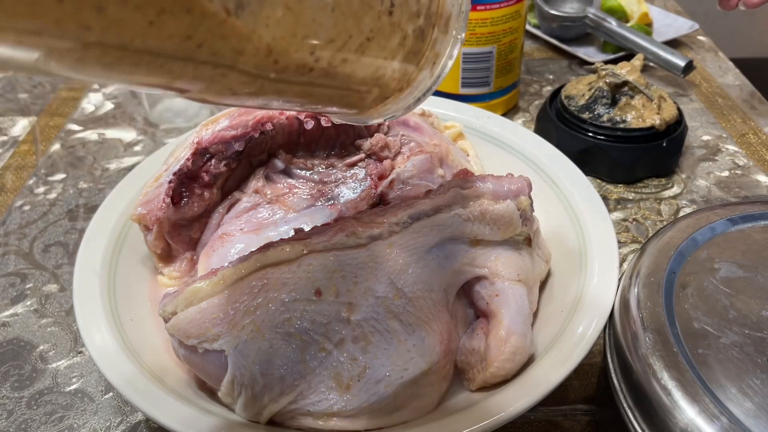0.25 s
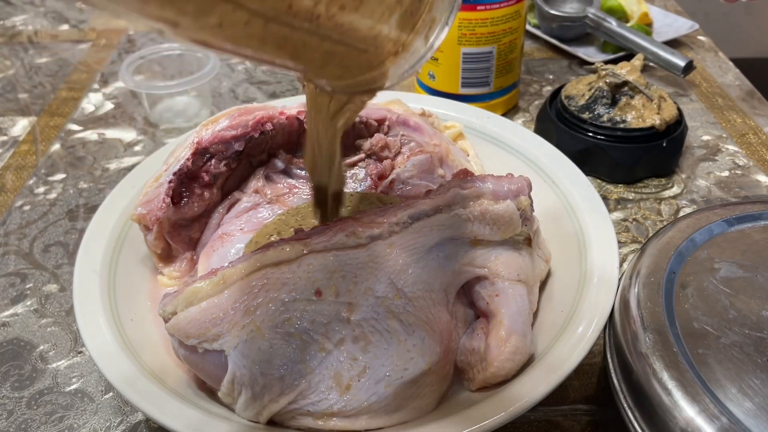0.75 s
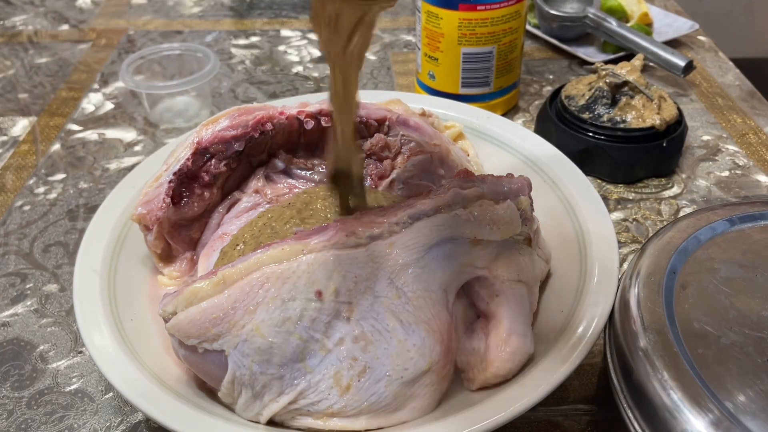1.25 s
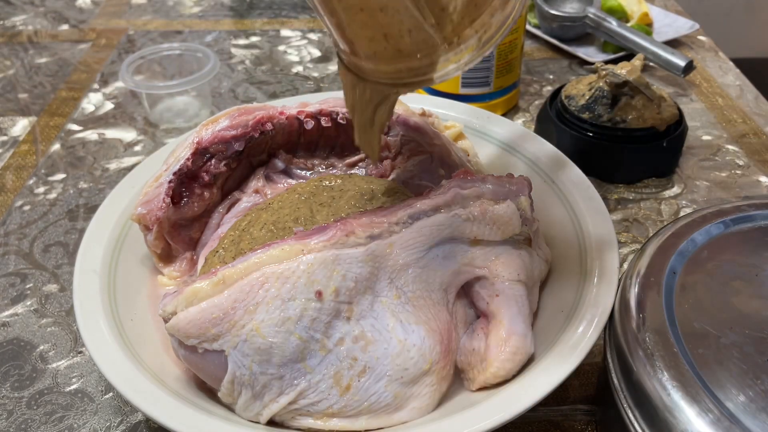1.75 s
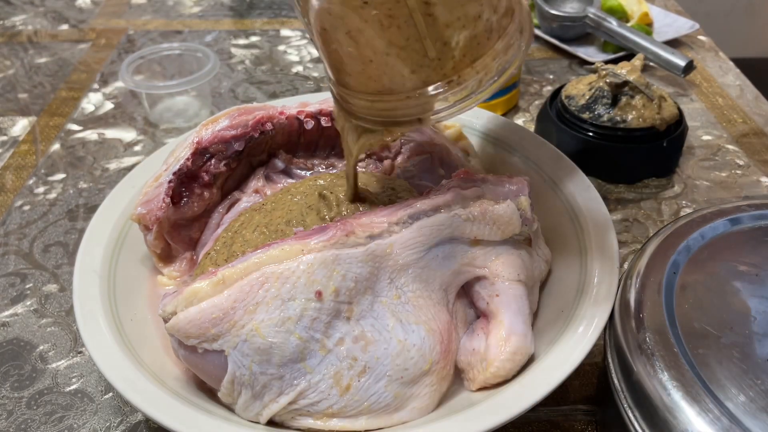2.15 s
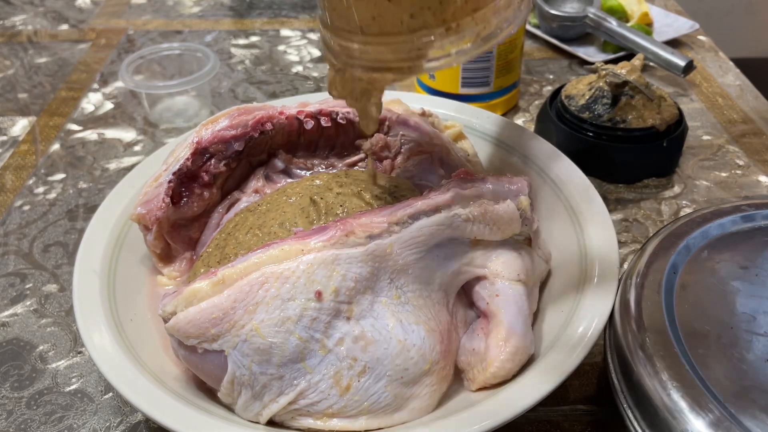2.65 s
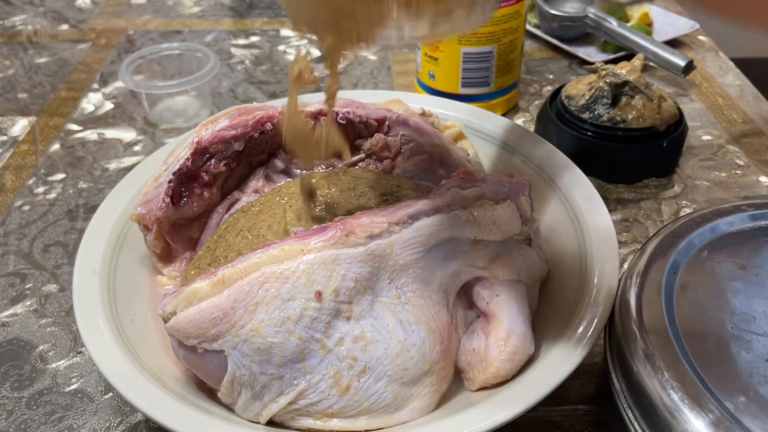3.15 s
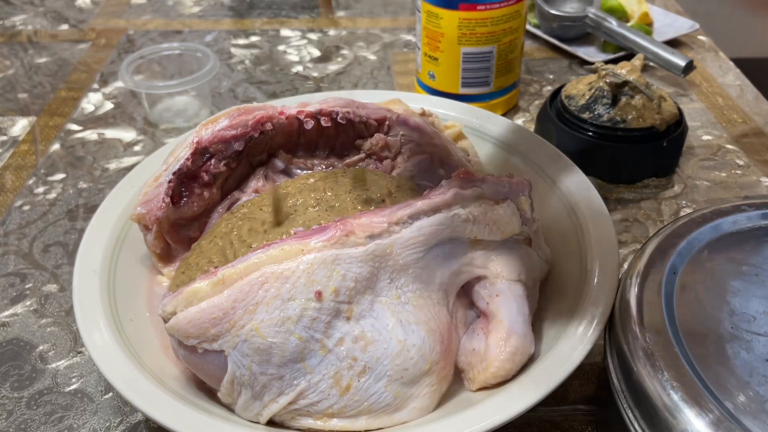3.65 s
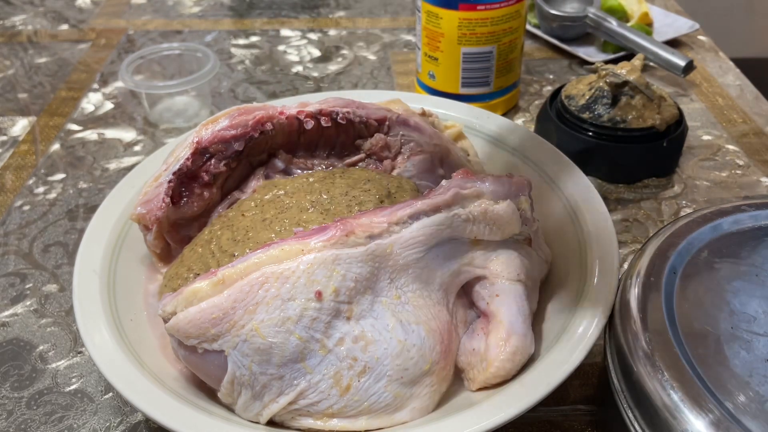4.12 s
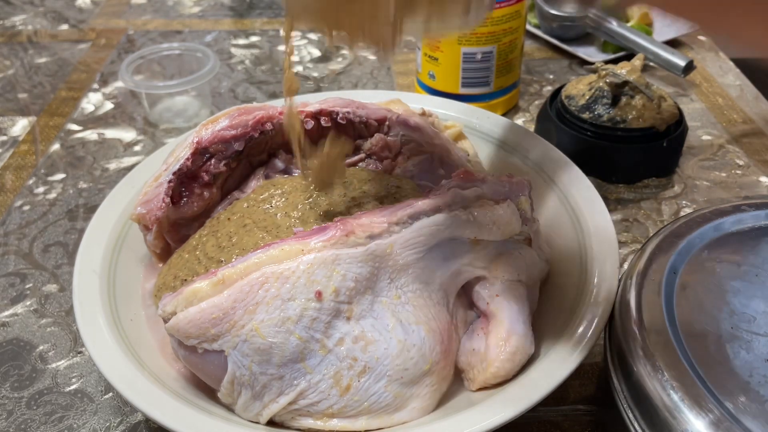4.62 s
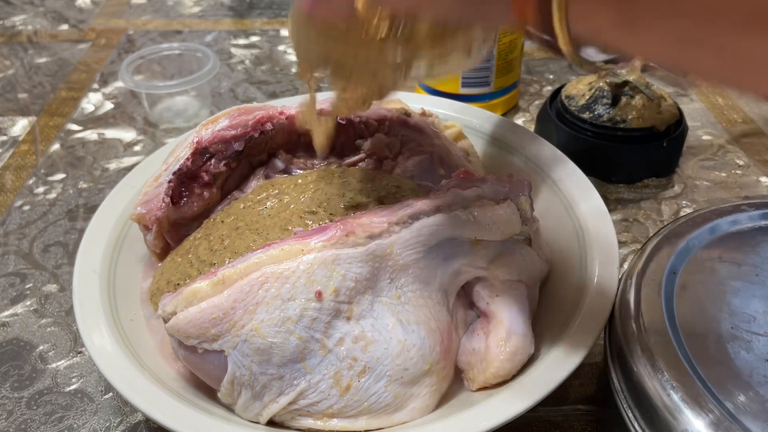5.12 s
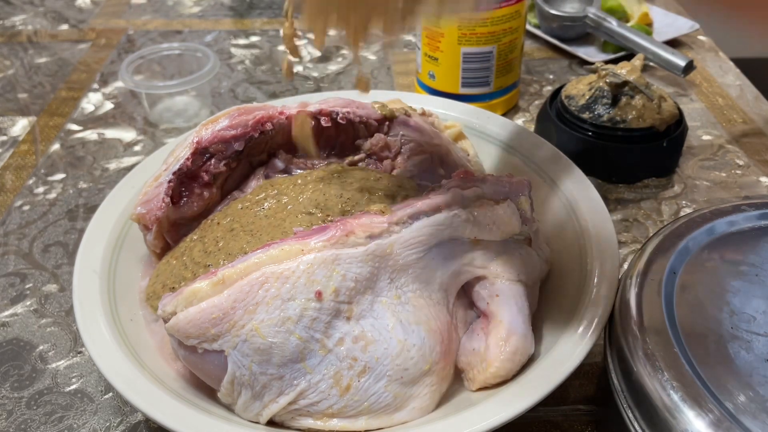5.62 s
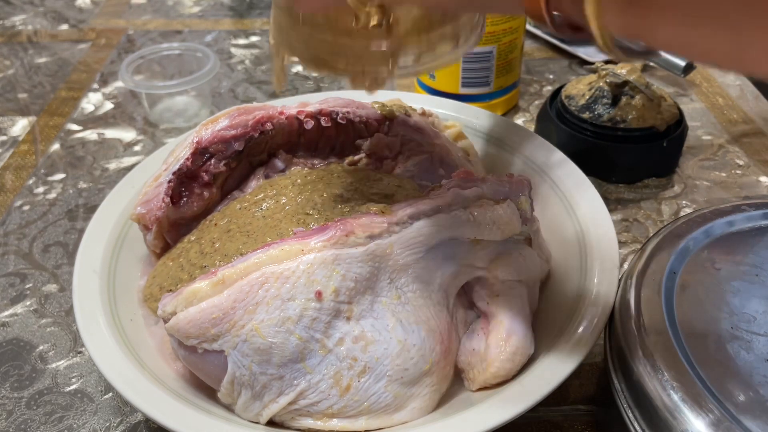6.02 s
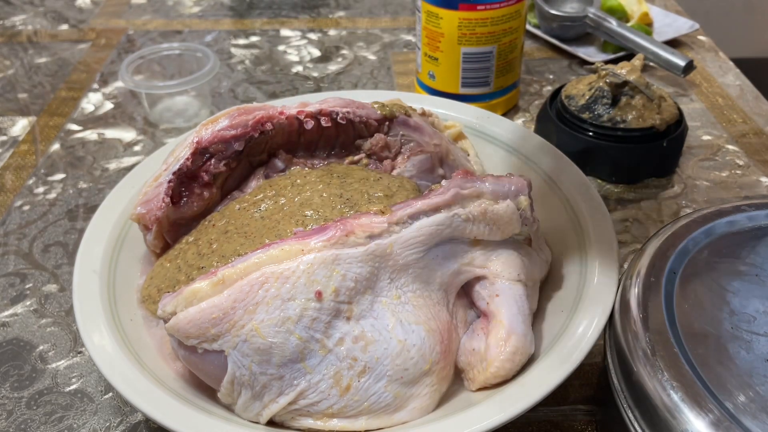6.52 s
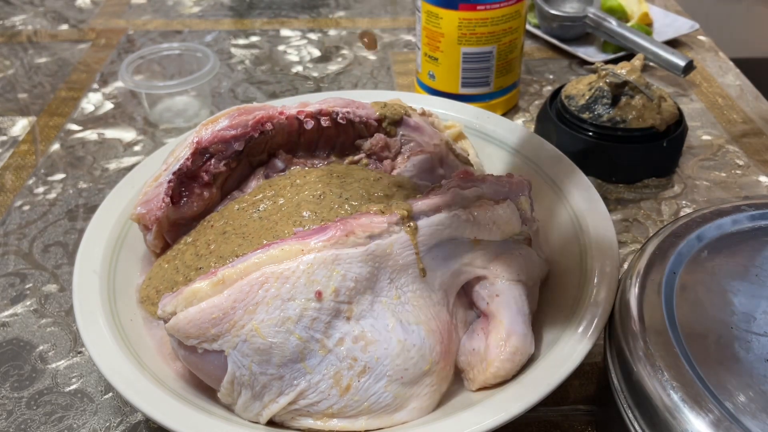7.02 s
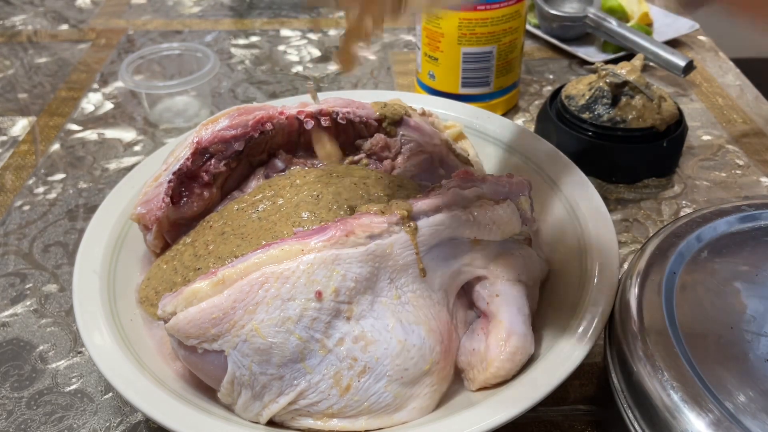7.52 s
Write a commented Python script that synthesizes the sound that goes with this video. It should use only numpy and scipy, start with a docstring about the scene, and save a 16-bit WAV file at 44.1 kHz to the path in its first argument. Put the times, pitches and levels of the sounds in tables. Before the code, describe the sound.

Thick paste crackles and pops softly from a glass jar while metal bangles clink sharply, with a vehicle passing outside.

```python
"""First you hear a quiet kitchen: a hum, a thin high whine and the engine of a vehicle passing outside.
Thick paste is shaken from a blender jar onto a chicken. It crackles as it peels off the glass, and its
air pockets pop and plop. Thin metal rings, likely bangles on the shaking wrist, clink, bounce and slide.
One distant boom rolls by early on. Near the end a smaller metal piece ticks and the jar takes a knock."""
import sys
import numpy as np
from scipy import signal
from scipy.fft import rfft, irfft
from scipy.io import wavfile

SR = 44100
rng = np.random.default_rng(int(sys.argv[2]) if len(sys.argv) > 2 else 0)


def output_pcm(signal):
    """Save a mono or channel-first signal as 16-bit PCM at the path in sys.argv[1].

    Samples are clipped to [-1, 1] before scaling.
    """
    pcm = np.clip(np.atleast_2d(signal).T, -1, 1) * 32767
    wavfile.write(sys.argv[1], SR, np.round(pcm).astype(np.int16))


N = 342657
TIME, HZ = np.arange(N) / SR, np.fft.rfftfreq(N, 1 / SR)


def amp(db):
    """Turns decibels into a number to multiply a sound by."""
    return 10 ** (np.asarray(db) / 20)

def unit(x):
    """Scales a sound to an average (rms) level of one."""
    return x / np.sqrt(np.mean(x ** 2) + 1e-30)

def read(points, hz):
    """Looks up a table's value at any frequency, blending between its rows."""
    f, value = np.transpose(points)
    return np.interp(np.log(hz + 1), np.log(f), value)

def add(mix, s, sound):
    """Mixes a sound in, starting at s seconds."""
    part = mix[round(s * SR):][:len(sound)]
    part += sound[:len(part)]

def drift(hz):
    """A random wobble, up to about hz times a second."""
    return unit(irfft(rfft(rng.standard_normal(N)) / (1 + (HZ / hz) ** 4), N))

def tone(hz, db):
    """A pure tone that follows a changing pitch."""
    return np.sqrt(2) * amp(db) * np.sin(2 * np.pi * np.cumsum(hz) / SR)

def swells(rows, half_s):
    """A level that rises and falls smoothly around each listed time."""
    return sum(amp(db) * np.exp(-((TIME - s) / half_s) ** 2) for s, db in rows)

def fade(t, t60):
    """Dies away by 60 dB in t60 seconds, the 'fade time'."""
    return amp(-60 * t / t60)

def dying(x, t60s, size=256):
    """Lets every frequency die away at its own speed."""
    hz, t, spectra = signal.stft(x, SR, nperseg=size)
    faded = spectra * fade(t, read(t60s, hz)[:, None])
    return signal.istft(faded, SR, nperseg=size)[1][:, :x.shape[1]]

def specks(per_s, spread_db):
    """Tiny clicks at random times, most weak and a few strong."""
    signs = rng.choice([-1, 1], N)
    sizes = amp(spread_db * np.minimum(rng.exponential(1, N), 4))
    return signs * sizes * (rng.random(N) < per_s / SR)

# How alike the room sounds on the left and right: (frequency [Hz], likeness [0 to 1])
LIKENESS = [(30, 0.97), (100, 0.99), (160, 0.94), (250, 0.64), (500, 0.27), (1000, 0.11), (2000, 0.15),
            (5000, 0.38), (9000, 0.689)]
def pair(noises):
    """Blends two noises into left and right spectra that are most alike in the bass."""
    a, b = rfft(noises)
    same = read(LIKENESS, np.fft.rfftfreq(noises.shape[1], 1 / SR))
    mid, side = a * np.sqrt((1 + same) / 2), b * np.sqrt((1 - same) / 2)
    return np.array([mid + side, mid - side])

def diffuse(spectrum):
    """Noise from all around, with the tone colour given by a table."""
    colour = amp(read(spectrum, HZ)) / np.sqrt(1 + (20 / (HZ + 1)) ** 4)
    return unit(irfft(pair(rng.standard_normal((2, N))) * colour, N))

# Borders of the five bands, low to high, that make up a hit: (frequency [Hz])
BAND_EDGES = [1200, 4700, 6800, 8200, 10300, 14000]
# Tone colour of the crack when things touch: (frequency [Hz], level [dB])
CRACK_COLOUR = [(1200, -11), (2300, -25.5), (3200, -9.5), (4300, -10.5), (5600, -1), (6500, -4.5),
                (7300, -16), (8600, 7.5), (9600, 5), (11100, 13.5), (12300, -14), (13100, -15.5),
                (13900, -23), (15000, -38)]
def strikes(rows, notes, crack_db=0, free_db=0, vary_db=0, detune=0, snap_db=0, size=4096):
    """Each hit cracks and rings an object's notes; touch stops them fast, but a free ring lasts."""
    out, t, hz = np.zeros(N), np.arange(size) / SR, np.fft.rfftfreq(size, 1 / SR)
    f, db, t60 = np.reshape(notes, (-1, 3)).T
    head = t < .005  # the first 5 ms set a hit's level
    attack = (1 - np.exp(-(t / .0004) ** 2)) * (1 + amp(snap_db) * np.exp(-t / .0012))
    free = amp(free_db) * fade(t, t60[:, None])
    for s, *levels_db, contact_t60 in rows:
        damped = fade(t, contact_t60)
        weight, shift, phase = rng.standard_normal((3, len(f), 1))  # each hit lands on another spot
        turns = f[:, None] * (1 + detune * shift) * t + phase
        rings = amp(db[:, None] + vary_db * weight) * np.sin(2 * np.pi * turns) * (damped + free) * attack
        noise = rfft(rng.standard_normal(size)) * amp(read(CRACK_COLOUR, hz))
        for lo, hi, level_db in zip(BAND_EDGES, BAND_EDGES[1:], levels_db):
            crack = irfft(noise * ((hz >= lo) & (hz < hi))) * damped * attack
            ring = rings[(f >= lo) & (f < hi)].sum(0)
            band = ring / (ring[head].std() + 1e-12) + amp(crack_db) * crack / crack[head].std()
            add(out, s, amp(level_db) * band / band[head].std())
    return out

def tilted(rows, colour_db, t60, pivot_hz=7000):
    """Gives light hits a level in each band: one shared colour, tilted brighter or duller."""
    s, db, tilt = np.transpose(rows)
    centres_hz = np.sqrt(np.multiply(BAND_EDGES[:-1], BAND_EDGES[1:]))
    levels_db = db[:, None] + colour_db + tilt[:, None] * np.log2(centres_hz / pivot_hz)
    return np.column_stack([s, levels_db, np.full(len(s), t60)])

# The still kitchen's low rush and high hiss: (frequency [Hz], level [dB])
AIR_COLOUR = [(20, -12), (45, -2.5), (85, -2), (130, -7), (177, -9.5), (240, -15.5), (330, -15), (480, -20),
              (700, -19.5), (1150, -32), (2000, -30.5), (3160, -52), (6000, -48), (16000, -71)]
HISS_COLOUR = [(3000, -13.5), (6000, -1), (9300, 5), (11300, 9), (12200, 0), (13000, -13.5), (16000, -22)]
# An appliance's humming notes: (pitch [Hz], level [dB])
HUM_NOTES = [(177.6, -71), (236.9, -74), (721.4, -80), (958.2, -82), (1986, -93.5)]
def room_tone():
    """Steady air noise and the slightly wavering hum of an appliance."""
    air = amp(-61) * diffuse(AIR_COLOUR) + amp(-87.5) * diffuse(HISS_COLOUR)
    return air + sum(tone(hz + 1.806 * drift(6.2), db + 2 * drift(4)) for hz, db in HUM_NOTES)

# Moments when the whine gets louder: (time [s], level [dB])
WHINE_SWELLS = [(.01, -76.5), (.16, -75), (.27, -70.5), (.8, -74), (.97, -86), (6.21, -67), (7.3, -88)]
def whine(hz=4940, resting_db=-85):
    """A thin high note that flutters and briefly swells."""
    note = tone(hz + 12 * drift(7.1) + 36 * drift(120), 4 * drift(22.02))
    return note * (amp(resting_db) + swells(WHINE_SWELLS, half_s=.032))

# Tone colours of engine rumble, exhaust drone and tyre roar: (frequency [Hz], level [dB])
ENGINE_COLOUR = [(25, -24), (55, -4.5), (80, 5), (110, -7.5), (160, -31.5), (400, -55.5)]
DRONE_COLOUR = [(60, -36.5), (115, 2.5), (190, -0.5), (255, -1.5), (310, -12), (450, -31), (1200, -60)]
TYRE_COLOUR = [(150, -14), (350, -3), (600, 2.5), (1000, 2.5), (1400, -3), (2200, -11.5), (4000, -19),
               (6500, -23), (9000, -32.5), (14000, -53.5)]
# The exhaust as the driver speeds up and eases off: (time [s], level at the nearest distance [dB])
DRONE_LEVELS = [(0, -70), (1.3, -61.5), (2.8, -62), (4.5, -52.5), (5.6, -47), (7.77, -56)]
# The engine's firing note, sinking as it goes by: (time [s], pitch [Hz], level [dB])
ENGINE_NOTE = [(0, 75.8, -62), (.5, 84.7, -61), (1.1, 75.5, -66), (1.8, 80, -53), (2.701, 87, -59.5),
               (3.3, 77, -60), (3.7, 72, -62), (4.7, 71, -61), (5.4, 61, -64.5), (7.77, 58, -79.5)]
def vehicle(pass_s=3.31, metres_per_s=11.5, nearest_m=8.78, pipe_hz=246.4):
    """The engine comes first, the tyres swell and fade with distance, and the exhaust drones away."""
    along = metres_per_s * (TIME - pass_s)
    distance = np.hypot(along, nearest_m)
    facing = (1 - np.tanh((TIME - 3.35) / .2)) / 2  # falls to 0 as the tailpipe turns into view
    rumble_db = -58.5 - 14.5 * facing
    drone_db = np.interp(TIME, *np.transpose(DRONE_LEVELS))
    tyres_db = -57.5 + 3 * along / distance  # louder from behind
    layers = (rumble_db, ENGINE_COLOUR), (drone_db, DRONE_COLOUR), (tyres_db, TYRE_COLOUR)
    roar = sum(amp(db + .8 * drift(8)) * diffuse(colour) for db, colour in layers)
    pipe = tone(pipe_hz + 6 * drift(15), drone_db - 10.5 + 3 * drift(5.7))  # the exhaust's own note
    s, hz, db = np.transpose(ENGINE_NOTE)
    firing = tone(np.interp(TIME, s, hz) + 2 * drift(12), np.interp(TIME, s, db) + 1.7 * drift(5.5))
    return (roar + pipe) * nearest_m / distance + firing

# Sticky crackle, growing with harder shaking: (time [s], level [dB])
CRACKLE_LEVELS = [(0, -105), (.7, -86.5), (2.5, -87.5), (3.3, -75.5), (4.4, -82), (5, -74), (5.9, -73),
                  (6.3, -102), (7.77, -83)]
# Lumps slipping down the glass: (time [s], level [dB])
LUMP_SLIPS = [(1.62, -80), (2.29, -76), (6.68, -67), (7.2, -82)]
def crackle(clump_db=3, dull_hz=8000):
    """Countless tiny snaps come in clumps as paste peels from the glass."""
    snaps = specks(per_s=420, spread_db=3.2)
    grain = unit(irfft(rfft(snaps) * amp(read(CRACK_COLOUR, HZ)) / (1 + (HZ / dull_hz) ** 4), N))
    level = amp(np.interp(TIME, *np.transpose(CRACKLE_LEVELS))) + swells(LUMP_SLIPS, half_s=.053)
    return grain * level * amp(clump_db * drift(25))

# Wet pops of the paste: (time [s], level [dB], brightness [dB per octave])
WET_POPS = [(.441, -70, 1), (.4493, -64, 4), (.628, -75.5, -6), (.9274, -67.5, -4), (.9425, -66.5, 8),
            (1.0753, -68, -3), (1.0976, -60, 10.5), (1.2583, -67, 10), (1.3185, -66, 3),
            (1.4173, -61.5, 4.5), (1.4903, -57.5, 1), (1.5616, -53, 0.5), (1.6251, -59.5, 3),
            (2.21, -81, 14), (3.6024, -63.5, 8), (1.9544, -67.5, -5), (2.6106, -62, 9.5), (3.0182, -62, 3),
            (3.8645, -60.5, 7), (4.2747, -51, -2), (4.5152, -56.5, 1), (4.734, -67, 7), (5.041, -67, -4.5),
            (5.0943, -62, 3), (5.3299, -66, 10), (5.4275, -56.5, 2.5), (5.5334, -60.5, 6),
            (5.7656, -62.5, 4), (5.8645, -63.5, -3.5), (5.9817, -59.5, 1), (6.5867, -64, 1),
            (7.145, -63, -0.5), (7.5668, -72, 16), (7.6891, -63, 3)]
# Their shared colour, one value a band: (level [dB])
POP_BANDS = [-3.5, 0, -2.5, -1.5, -5.5]
def pops():
    """Air pockets snap open in the paste: a short crack with no ring."""
    return strikes(tilted(WET_POPS, POP_BANDS, t60=.016), notes=[], snap_db=2.5, size=2048)

def bounces(hits, softer_db=-22, loss_db=-5, gap_s=.0077, t60=.042, count=2):
    """After each clink the loose rings bounce against each other, softer every time."""
    gaps = gap_s * rng.uniform(.3, 2, (len(hits), count))
    rows = []
    for k, delay in enumerate(np.cumsum(gaps, axis=1).T):
        levels_db = hits[:, 1:-1] + softer_db + k * loss_db
        rows.append(np.column_stack([hits[:, 0] + delay, levels_db, np.full(len(hits), t60)]))
    return np.vstack(rows)

# Bangle hits: (time [s], level [dB], low boost [dB], high boost [dB], fade time while touching [s])
BANGLE_HITS = [(1.6251, -46, -2, -9, .06), (2.8114, -24.5, 1.5, 1, .009), (2.8305, -28, -0.5, -1, 0.022),
               (2.8412, -43, 5.5, 0.5, 0.067), (3.0412, -58, 14, 4, 0.036), (3.1236, -33, 3, -0.5, .013),
               (3.1488, -47.5, 9, 7, .032), (3.1921, -50, 2.5, 1.5, 0.026), (3.4248, -48, 6.5, 0.5, .028),
               (3.4464, -25.5, 0.5, 9.5, .02), (3.4627, -34.5, 5.5, 0, .018), (3.6502, -31, -2.5, 6.5, .02),
               (3.6562, -42, -2.5, 2, .02), (3.6618, -41, 5, -8, .088), (3.679, -31.5, -4, 8, .013),
               (3.6863, -36.5, 3.5, -8, 0.067), (3.7269, -29, -3, -1.5, 0.025),
               (3.7468, -51.5, 11, 12, .11), (3.7831, -23.5, -1.5, -1, 0.039),
               (3.8057, -41.5, 4.5, -14, .018), (4.2048, -43, 6, 3, .07), (4.2072, -40, 7, 4, .024),
               (4.2287, -27, -1, 0, .021), (4.2395, -32.5, 1, 5, 0.03), (4.309, -39, -3.5, 0, .039),
               (4.5194, -44, -1, -4, 0.019), (4.5462, -31.5, 1, -4, 0.037), (4.5849, -19.5, -1, -1.5, .027),
               (4.6014, -34.5, 4.5, -1, .028), (4.669, -45.5, -1, 5, .061), (4.7967, -40.5, 4, 0, .04),
               (4.84, -30.5, 1, -1, .03), (4.8778, -21.5, 0.5, 2.5, .014), (4.895, -36, 1.5, -4, .025),
               (4.9598, -44, 3.5, 9, 0.038), (5.1454, -17, -5, -2, .027), (5.1563, -35.5, 0.5, -2, .03),
               (5.2774, -35, -1.5, 6, 0.017), (5.2871, -36.5, -2.5, -10, 0.055), (5.3544, -48, 3, -4, .048),
               (5.3857, -27, 3.5, 3.5, 0.017), (5.62, -30, 6, 4, 0.02)]
# Their shared colour, one value a band, with the main ring in the fourth: (level [dB])
CLINK_BANDS = [-23.5, -18.5, -12.5, -0.5, -6]
# The notes a bangle rings with: (pitch [Hz], level [dB], fade time [s])
BANGLE_NOTES = [(1410, -17, .09), (1905, -21, .08), (2655, -14, .08), (3150, -21, .05), (3360, -16, .08),
                (4350, -19, .07), (5090, -8, .08), (5400, -16, .05), (5760, -15, .06), (5930, -14, .06),
                (6600, -22, .08), (7240, -18, .07), (7775, -1, .08), (8560, -10, .04), (8720, -6, .05),
                (8820, 0, .08), (8950, -5, .05), (9120, -12, .05), (9460, -7, .08), (10720, -10, .04),
                (11150, -9, .05), (11430, -10, .06), (11900, -2, .06), (12050, -2, .05), (12800, -3, .07)]
def clinks():
    """Bangles clash as the wrist shakes; where they hit sets how low or bright they sound."""
    s, db, low_db, high_db, t60 = np.transpose(BANGLE_HITS)
    spot_db = np.column_stack([low_db, low_db, low_db, np.zeros(len(s)), high_db])
    hits = np.column_stack([s, db[:, None] + CLINK_BANDS + spot_db, t60])
    contacts = np.vstack([hits, bounces(hits)])
    return strikes(contacts, BANGLE_NOTES, crack_db=-5.5, free_db=-10, vary_db=3.5, detune=.003,
                   snap_db=-1.5)

# Tone colour of the boom's rumble: (frequency [Hz], level [dB])
BOOM_COLOUR = [(18, -30.5), (38, -0.5), (70, 1), (110, -3.5), (190, -6), (350, -15), (800, -23.5),
               (1500, -29.5), (3000, -39.5), (6000, -58), (12000, -88.5)]
# How long it rolls on: (frequency [Hz], fade time [s])
BOOM_FADES = [(40, 6.2), (90, 1.6), (200, 1.4), (1000, 3.4), (4000, 4.8)]
def boom(start_s=1.69, throb_hz=42, rise_s=.024, push_s=.00577):
    """A far thud: one push of air, a rumble rolling away, and the house throbbing at its own low note."""
    t = np.maximum(TIME - start_s, 0)
    rolling = dying(diffuse(BOOM_COLOUR)[:, :2 * SR], BOOM_FADES, size=2048)
    rumble = np.zeros((2, N))
    for channel, sound in zip(rumble, rolling):
        add(channel, start_s, sound)
    throb = -np.sin(2 * np.pi * throb_hz * t) * fade(t, t60=1.95)
    from_peak = t / push_s - 4
    push = (1 - from_peak ** 2) * np.exp(-from_peak ** 2 / 2)
    return (amp(-45) * rumble + amp(-42) * throb + amp(-30) * push) * (1 - np.exp(-t / rise_s))

# Air pockets in falling lumps of paste: (time [s], pitch [Hz], level [dB], fade time [s])
AIR_POCKETS = [(2.088, 1170, -49.5, 0.05), (2.097, 1295, -70, 0.047), (4.274, 677, -45, 0.041),
               (4.275, 1470, -41.5, 0.025), (4.276, 1990, -47.5, 0.031), (5.146, 1450, -52.5, 0.057)]
def plops(glide=.2, rise_s=.0013):
    """Each air pocket rings briefly and rises in pitch."""
    out, t = np.zeros(N), np.arange(SR // 8) / SR
    for s, hz, db, t60 in AIR_POCKETS:
        ring = np.sin(2 * np.pi * hz * t * (1 + glide * t / t60)) * fade(t, t60)
        add(out, s, amp(db) * ring * (1 - np.exp(-t / rise_s)))
    return out

# Bangles sliding along each other between clashes: (time [s], level [dB])
BANGLE_SLIDES = [(3.06, -61), (3.41, -65), (3.695, -40), (4.195, -56), (4.565, -59), (4.808, -57),
                 (4.862, -51.5)]
def rubbing(t60=.023, rise_s=.0004):
    """Tiny slips ring the bangles while they slide pressed together."""
    t = np.arange(2048) / SR
    ring = sum(amp(db) * np.sin(2 * np.pi * hz * t) for hz, db, _ in BANGLE_NOTES)
    ring *= fade(t, t60) * (1 - np.exp(-(t / rise_s) ** 2))
    slips = specks(per_s=700, spread_db=4)
    return unit(signal.oaconvolve(slips, ring)[:N]) * swells(BANGLE_SLIDES, half_s=.013)

# Light hits on a smaller metal piece: (time [s], level [dB], brightness [dB per octave])
TICK_HITS = [(5.5107, -58.5, 5.5), (5.727, -66, 10), (5.7428, -57.5, -4), (6.1777, -69, -2),
             (6.6214, -55, -4), (6.7743, -62, -7), (6.7891, -60.5, 0.5), (6.9507, -50, 1.5),
             (6.9578, -52.5, -5), (7.0288, -63.5, -2.5), (7.1888, -57, -7.5), (7.2112, -65, -3),
             (7.2541, -70.5, 9), (7.3519, -71, 4), (7.4527, -59.5, 2), (7.6068, -71.5, 16.5),
             (7.7147, -77, 5), (7.7382, -63.5, 6.5)]
# Their shared colour, one value a band: (level [dB])
TICK_BANDS = [-31, -9.5, -1.5, -6.5, 8.5]
# The notes that piece rings with: (pitch [Hz], level [dB], fade time [s])
TICK_NOTES = [(6650, -8, .05), (7170, -3, .07), (8300, -14, .03), (11000, 0, .06), (11200, -2, .11),
              (11950, -8, .05), (12250, -7, .05)]
def ticks():
    """A small metal piece is tapped lightly and rings very high."""
    hits = tilted(TICK_HITS, TICK_BANDS, t60=.029)
    return strikes(hits, TICK_NOTES, crack_db=-.5, free_db=4, vary_db=-3, detune=.002, snap_db=-10)

# A knock on the jar: (time [s], five band levels [dB], fade time while touching [s])
JAR_HITS = [(5.9039, -46.5, -39.5, -37.5, -36, -43.5, 0.091)]
# The notes the jar rings with: (pitch [Hz], level [dB], fade time [s])
JAR_NOTES = [(1902, 2, 0.12), (2800, -16, 0.13), (4410, 0.5, 0.06), (5980, 9, 0.037), (5800, -2, .04),
             (7750, 10, 0.077), (7700, -12, 0.055), (9760, -2, 0.021), (10900, -6, 0.17), (11630, -5, 0.13),
             (12790, -8, .04)]
def jar_knock():
    """The glass jar is knocked once and rings freely."""
    return strikes(JAR_HITS, JAR_NOTES, crack_db=-11.5, free_db=20, detune=.00044, snap_db=-20, size=8192)

# How long the kitchen echoes: (frequency [Hz], fade time [s])
ECHO_FADES = [(500, .4), (3000, 0.58), (8000, 0.17), (13000, 0.1)]
def kitchen(x, tail_db, early_db, early_s, left_db):
    """The sound itself, quick echoes from the table and plate, then a short tail from the walls."""
    t = np.arange(SR // 2) / SR
    taps = irfft(pair(rng.standard_normal((2, len(t)))), len(t)) * (t > .003)
    tail, early = dying(taps, ECHO_FADES), taps * np.exp(-t / early_s)
    echo = amp(tail_db) * tail / np.linalg.norm(tail[0])
    echo += amp(early_db) * early / np.linalg.norm(early[0])
    in_room = x + signal.fftconvolve(x[None], echo, axes=1)[:, :N]
    return in_room * amp([[left_db / 2], [-left_db / 2]])

def scene():
    """Metal, glass and paste sound close by, over a background that leans to the left."""
    ringing = amp(-1) * clinks() + ticks() + amp(-1) * jar_knock() + rubbing()
    near = kitchen(ringing, tail_db=-17.5, early_db=-12, early_s=.009, left_db=-.1)
    paste = amp(.5) * pops() + plops() + amp(-1.5) * crackle()
    near += kitchen(paste, tail_db=-10, early_db=-14, early_s=.01, left_db=2.5)
    background = room_tone() + whine() + vehicle() + boom()
    return near + background * amp([[.7], [-.7]])

# How far the wave at the left microphone opening runs ahead: (frequency [Hz], lead [radians])
LEFT_LEAD = [(300, 0), (3000, .35), (5200, .65), (6800, -.2), (7600, 1.1), (8100, .9), (8550, 0),
             (10200, -3.14), (12000, -6.28), (13700, -9.4), (16000, -12)]
# How much louder the left opening hears: (frequency [Hz], level [dB])
LEFT_BOOST = [(1200, 0), (2600, 1.8), (5000, 0)]
def record(dry, cutoff_hz=16400):
    """Two microphone openings hear the treble slightly out of step; the very highest sound is cut."""
    lean = np.log(amp(read(LEFT_BOOST, HZ))) + 1j * read(LEFT_LEAD, HZ)
    heard = irfft(rfft(dry) * np.exp(.5 * lean * np.array([[1], [-1]])), N)
    lowpass = signal.firwin(511, cutoff_hz, window=("kaiser", 9), fs=SR)
    return signal.oaconvolve(heard, lowpass[None], "same")


dry = scene()
out = record(dry)
output_pcm(out)
```